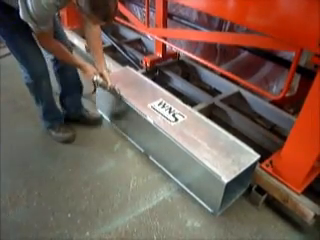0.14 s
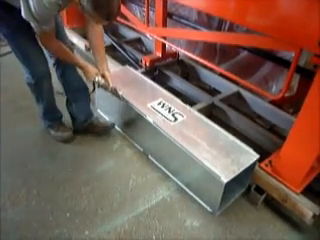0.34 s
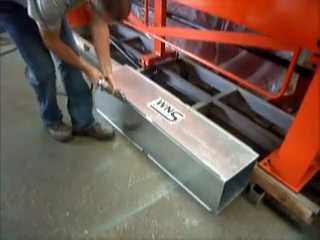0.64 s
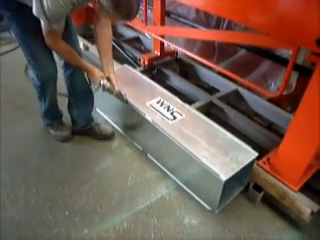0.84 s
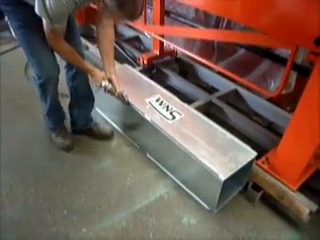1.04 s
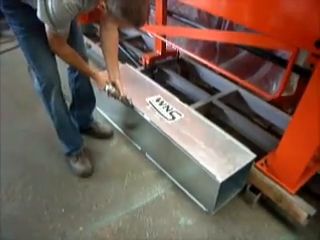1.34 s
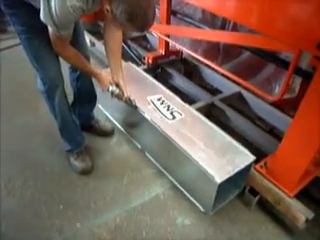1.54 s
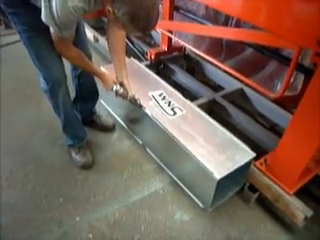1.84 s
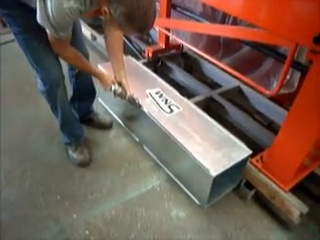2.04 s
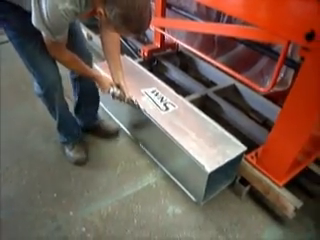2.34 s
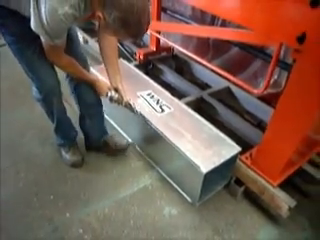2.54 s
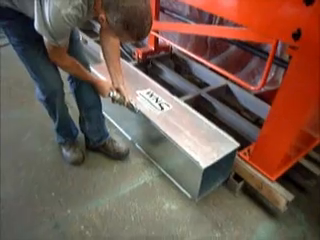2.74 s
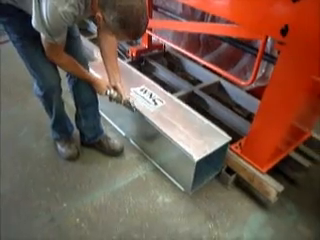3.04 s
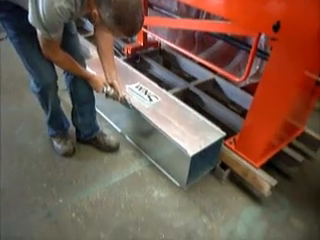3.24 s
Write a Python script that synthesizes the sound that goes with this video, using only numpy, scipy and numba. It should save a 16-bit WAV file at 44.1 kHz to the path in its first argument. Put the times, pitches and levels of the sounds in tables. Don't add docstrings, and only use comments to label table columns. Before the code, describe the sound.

An air hammer already runs at 0 s and roars until the end at 3.4 s: roughly 30-37 blows a second on a hollow sheet-metal duct, each with a rebound, bright clattering ring and low thump. One blow weakens near 0.1 s; duct boom swells around 1.3 and 1.7 s; a tiny stutter comes at 2.0 s. Workshop reverb, compressed small microphone metres away, nothing above 4 kHz.

```python
import sys
import numpy as np
from scipy import signal
from scipy.fft import rfft, irfft, next_fast_len
from scipy.io import wavfile
from scipy.ndimage import uniform_filter1d
from numba import njit

SR = 44100
rng = np.random.default_rng(int(sys.argv[2]) if len(sys.argv) > 2 else 0)


def store_wav(level_fs):
    pcm = np.round(np.clip(np.atleast_2d(level_fs), -1, 1) * 32767)
    wavfile.write(sys.argv[1], SR, pcm.T.astype(np.int16))


def makeup_ratio(level_db):
    decades = np.asarray(level_db, float) / 20
    return 10 ** decades


N = 149940


# t/s, rate/blows per s
BLOW_RATE = [(0, 36.3), (.29, 30.81), (.4, 34.73), (.51, 31.1), (.62, 34.12), (1.15, 33.54), (1.32, 36.3),
             (1.4, 30.95), (1.69, 35.95), (1.8, 31.9), (2.03, 37.44), (2.23, 34.49), (2.34, 35.22),
             (2.66, 35.17), (2.74, 30.24), (2.85, 33.67), (3.2, 33.65), (3.4, 31.42)]
# t/s, level/dB
HAND_PUSH = [(0, -0.5), (.09, -1), (.3, -2), (.8, -2), (1.2, -1), (1.45, -2.5), (1.95, -2.5), (2.15, -0.5),
             (2.55, 0), (2.9, 0), (3.4, -1)]
# blow/s, rebound/s
TIMING_JITTER = [.0003, .0015]
FIRST_BLOW_CYCLES = .025
SLIP_S, SLIP_DB = .112, -14
BLOW_SCATTER_DB = 1
REBOUND_CYCLES, REBOUND_DB, REBOUND_DB_PER_S = .2, -7, 0.47
LEAD_S = .0225


def hammer(t):
    cycles = np.cumsum(np.interp(t, *np.array(BLOW_RATE).T)) / SR - FIRST_BLOW_CYCLES
    blow = np.arange(-8, 118)
    hits = np.c_[blow, blow + REBOUND_CYCLES]
    when = np.interp(hits, np.r_[-9, cycles], np.r_[-.25, t], right=9)

    db = np.interp(when, *np.array(HAND_PUSH).T)
    db = db + BLOW_SCATTER_DB * rng.standard_normal(when.shape) + [0, REBOUND_DB]
    db[:, 1] += REBOUND_DB_PER_S * np.clip(when[:, 1], 0, 4)
    db += SLIP_DB * (abs(when[:, :1] - SLIP_S) < .015)

    when = when + TIMING_JITTER * rng.standard_normal(when.shape)
    return cycles, when.ravel() - LEAD_S, db.ravel()


# f/Hz, level/dB per Hz
PANEL_COLOUR = [(45, -19), (110, -15.5), (200, -7.5), (580, -17), (760, -8), (1650, -7.5), (2900, -2.5),
                (3700, -5)]
# f/Hz, width/Hz, extra level/dB, loudest t/s, reach/s
SEAM_GROUPS = [(134, 12, -5.5, 2.5, 0.96), (120, 26, 3, 0, 3), (289.5, 49, 18, -.5, 3.36),
               (476.7, 45, 10, 0.5, 3.9), (813, 78, 4.5, 3, 1.6), (975.4, 30, 9, 1.5, 0.95),
               (1091, 45, 9.5, 2.5, 1.2), (1470, 69, 5.5, 2, 0.78), (1490, 94, 4, .6, 1.4),
               (1793, 82, 8, 1.0, 0.5), (670, 130, 5, -1.6, 3.5), (2330, 54, 6.5, 2, 1.4),
               (2910, 110, 2, 3.5, 0.93), (2954, 230, 2.5, 3.5, 1.7), (3160, 120, -4, 7.5, 5.8),
               (2070, 130, 4.5, 0.6, 1.2), (875, 10, 5, 1.5, 0.22), (2630, 92, 4, 2.5, 0.2),
               (3590, 230, 1.5, 2, 2.2)]
# f/Hz, t60/s, share that repeats from blow to blow/0-1
PANEL_DECAY = [(60, .35, .3), (140, .3, .2), (300, .14, .2), (700, .35, .25), (1500, .33, .4),
               (2800, .25, .75), (3800, .16, .8)]
MODE_SPACING_HZ, UNEVEN_DB = 6.4, .7
DAMPED_HZ, DAMPED_T60_SHARE, CRACK_DB = 2450, .2, 1
CRACK_START_DB, CRACK_FADE_DB_PER_S = 3.5, 1.6
PUSH_SCATTER_DB, DRIFT_RAD = 1.5, .36
AIR_LED_HZ, AIR_LAG_S = 379.4, .016
BEND_LAG, SPREAD_S = .75, .0017


def duct(when, db, count=640):
    hz = 40 + MODE_SPACING_HZ * (np.arange(count) + rng.random(count))

    def along(table, column):
        points = np.array(table)
        return np.interp(np.log(hz), np.log(points[:, 0]), points[:, column])

    t60 = np.clip(along(PANEL_DECAY, 1), .02, 2)
    same = np.clip(along(PANEL_DECAY, 2), 0, 1)[:, None]
    damped = (np.arange(count) % 2 == 1) & (hz > DAMPED_HZ)
    t60 = np.where(damped, DAMPED_T60_SHARE * t60, t60)

    mode_db = CRACK_DB * damped + along(PANEL_COLOUR, 1) + UNEVEN_DB * rng.standard_normal(count)
    mode_db = mode_db - 10 * np.log10(t60)
    gain_db = mode_db[:, None] + db
    crack_db = CRACK_START_DB - CRACK_FADE_DB_PER_S * np.clip(when, 0, 4)
    gain_db = gain_db + np.outer(damped, crack_db)
    for f, width, extra_db, at_s, reach_s in SEAM_GROUPS:
        near_pitch = np.exp(-2 * ((hz - f) / width) ** 2)
        near_tool = np.exp(-.5 * ((when - at_s) / reach_s) ** 2)
        gain_db = gain_db + extra_db * np.outer(near_pitch, near_tool)

    chance = rng.standard_normal((4, count, len(when)))
    fresh = makeup_ratio(PUSH_SCATTER_DB * chance[0]) * np.exp(1j * np.sqrt(-np.log(same)) * chance[1])
    drift = DRIFT_RAD * np.cumsum(chance[2], axis=1)
    kept = np.exp(1j * (2 * np.pi * rng.random((count, 1)) + drift))
    push = makeup_ratio(gain_db) * kept * fresh

    lag = np.where(hz < AIR_LED_HZ, AIR_LAG_S, BEND_LAG / np.sqrt(hz))[:, None]
    lag = lag + SPREAD_S * chance[3, :, :1]
    at = np.maximum.accumulate((when + lag) * SR, axis=1)

    turn = 2j * np.pi * hz / SR - np.log(1000) / (t60 * SR)
    part_sample = np.ceil(np.maximum(at, 0)) - at
    return ring(np.exp(turn), at, push * np.exp(turn[:, None] * part_sample), N)


@njit
def ring(pole, at, push, n):
    out = np.zeros(n)
    for m in range(len(pole)):
        z, k = 0j, 0
        for i in range(n):
            z *= pole[m]
            while k < at.shape[1] and at[m, k] <= i:
                z += push[m, k]
                k += 1
            out[i] += z.imag
    return out


# t/s, level/dB
DUCT_BOOM = [(0, -36), (.5, -36), (.95, -32), (1.28, -26.5), (1.48, -31), (1.7, -25.5), (2.2, -29),
             (2.6, -30), (2.9, -35), (3.2, -32), (3.4, -34)]
THUMP_DB, THUMP2_DB = -42, -50.5
PUFF_DB, PUFF_S = -30.5, 0.012


def tool(cycles):
    thump = makeup_ratio(THUMP_DB + 3.5 + 3 * walk(15)) * np.cos(2 * np.pi * (cycles - .1))
    thump2 = makeup_ratio(THUMP2_DB + 2.5 + 1.2 * walk(33)) * np.cos(4 * np.pi * cycles + walk(8.1))

    t = np.arange(N) / SR
    even = uniform_filter1d(cycles - 34 * t, SR // 5) + 34 * t
    boom_db = np.interp(t, *np.array(DUCT_BOOM).T) + 3 + 1 * walk(14)
    boom = makeup_ratio(boom_db) * np.cos(8 * np.pi * even + 0.44 * walk(9))

    high_pass = signal.butter(2, 2200, "high", fs=SR, output="sos")
    hiss = signal.sosfilt(high_pass, rng.standard_normal(N))
    since_puff_s = ((cycles + 0.043) % 1) / 34
    puffs = level(hiss * np.exp(-since_puff_s / PUFF_S), PUFF_DB)
    return thump + thump2 + boom + puffs


HALL_T60_S = 0.96


def hall(x):
    s = np.arange(SR) / SR
    tail = rng.standard_normal(SR) * makeup_ratio(-60 * s / HALL_T60_S) * (s > .012)
    earlier = x[SR:0:-1]
    return signal.fftconvolve(np.r_[earlier, x], tail)[SR:SR + N]


def level(x, db):
    return x * makeup_ratio(db) / np.sqrt(np.mean(x ** 2))


def walk(rate):
    hold = int(SR / rate)
    steps = np.repeat(rng.standard_normal(N // hold + 1), hold)
    return 1.3 * uniform_filter1d(uniform_filter1d(steps, hold), hold)[:N]


DUCT_DB, HALL_DB = -12.5, -4.5


def scene():
    cycles, when, db = hammer(np.arange(N) / SR)
    metal = level(duct(when, db), 0)
    echo = level(hall(metal), HALL_DB)
    return (level(metal + echo, DUCT_DB) + tool(cycles))[None]


def band_limit(x):
    return signal.sosfilt(signal.butter(12, 15900, fs=SR, output="sos"), x)


# f/Hz, level/dB
MICROPHONE_TOP = [(20, 0), (3620, 0), (3750, -4), (3900, -12), (4000, -20), (4080, -30), (4140, -48),
                  (4200, -90)]
LEVELLER_S, LEVELLER_SHARE, CEILING = .09, .5, 1.05
STUTTER_S, REPEAT_S, STEP = 2.02086, .0145, -.53


def record(dry):
    def power(s):
        return uniform_filter1d(dry ** 2, int(s * SR), mode="mirror")

    levelled = dry * (power(0.93) / power(LEVELLER_S)) ** (LEVELLER_SHARE / 2)
    clipped = CEILING * np.tanh(levelled / CEILING)

    size = next_fast_len(N + 4096)
    hz = np.arange(size // 2 + 1) * SR / size
    low_pass = makeup_ratio(np.interp(hz, *np.array(MICROPHONE_TOP).T))
    x = irfft(rfft(clipped, size) * low_pass, size)[:, :N]

    cut = int(STUTTER_S * SR)
    back = cut - int(REPEAT_S * SR) + np.arange(-60, 60)
    back = back[np.argmin(abs(x[0, back] - x[0, cut - 1] - STEP))]
    x = np.c_[x[:, :cut], x[:, back:back + N - cut]]
    return band_limit(x)


dry = scene()
out = record(dry)
store_wav(out)
```